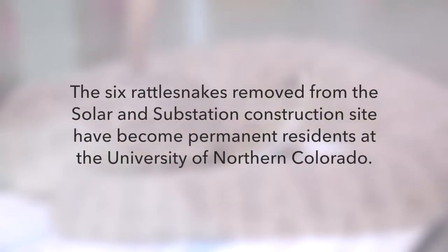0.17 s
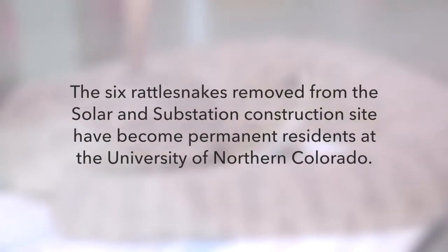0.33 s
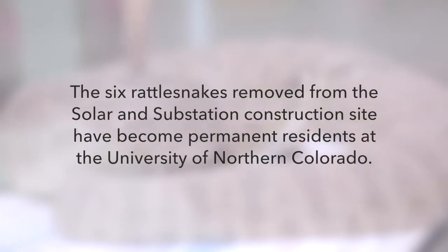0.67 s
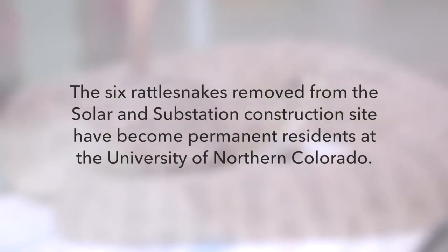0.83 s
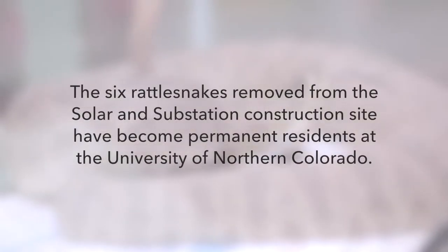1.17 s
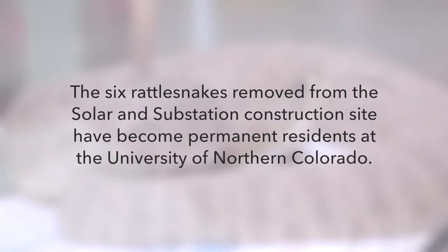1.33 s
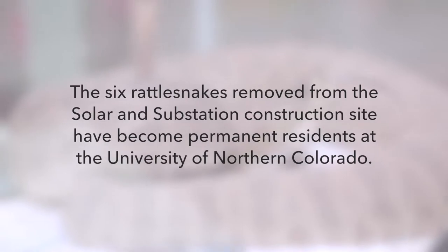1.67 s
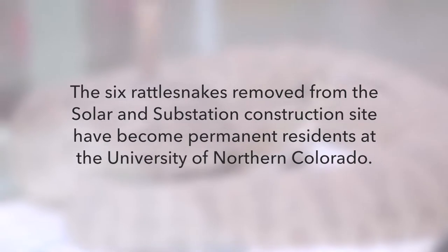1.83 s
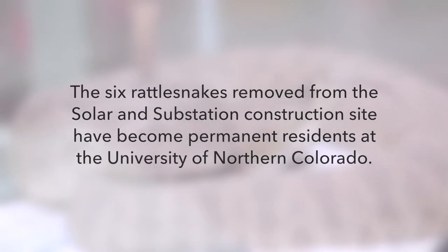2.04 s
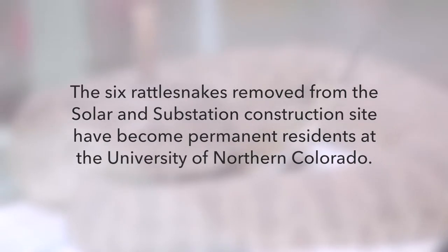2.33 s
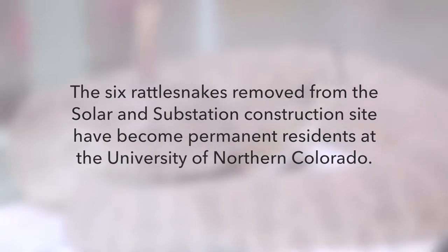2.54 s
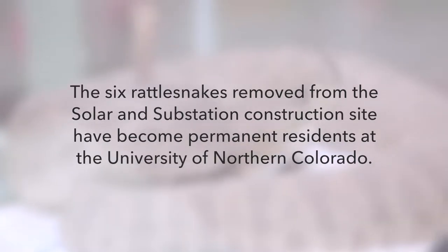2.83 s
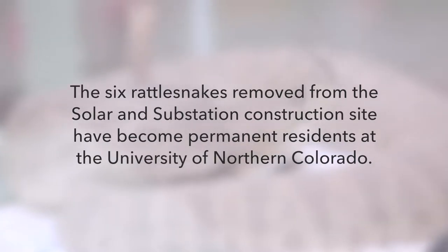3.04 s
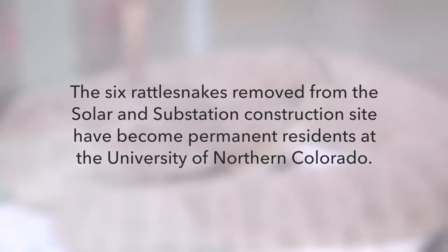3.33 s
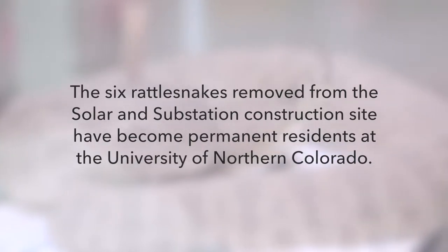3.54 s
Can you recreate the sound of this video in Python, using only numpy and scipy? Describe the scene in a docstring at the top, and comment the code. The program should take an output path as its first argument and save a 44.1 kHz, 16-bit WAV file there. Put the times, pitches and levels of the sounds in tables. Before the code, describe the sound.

A rattlesnake's tail buzzes steadily up close in a small room over a faint fan hum.

```python
"""A rattlesnake buzzes its tail close to a mono microphone in a small room: random clacks of hollow segments
crowd together several times in each shake, and cross-fading colours follow the turning tail.
Behind it a fan hums low, as wavering tones over shaped room noise.
Far off something knocks and bounces: a struck panel's short rings and noise cracks, smeared by the room."""
import sys
import numpy as np
from scipy import signal
from scipy.fft import rfft, irfft, next_fast_len
from scipy.io import wavfile
from scipy.ndimage import map_coordinates

SR = 44100
rng = np.random.default_rng(int(sys.argv[2]) if len(sys.argv) > 2 else 0)


def convert_level_to_amplitude(level_db):
    """Map a level in decibels to its linear amplitude factor."""
    exponent = np.asarray(level_db, float) / 20
    return 10 ** exponent


def log_audio(samples):
    """Write samples as a 16-bit WAV file to the path given in sys.argv[1]."""
    # one column per channel
    frames = np.atleast_2d(samples).T
    # limit to full scale, then quantise
    limited = np.clip(frames, -1, 1)
    pcm = np.round(limited * 32767).astype(np.int16)
    wavfile.write(sys.argv[1], SR, pcm)


N = 163170


def unit(x):
    """Scaled to rms 1."""
    return x / np.sqrt(np.mean(x ** 2) + 1e-20)


def curve(rows):
    """(time [s], value) rows read at every sample."""
    return np.interp(np.arange(N) / SR, *np.transpose(rows))


def wobble(rate):
    """A smooth random curve through normal draws, rate knots a second (60 at most)."""
    knots = rng.standard_normal(int(N * 60 / SR) + 4)
    return map_coordinates(knots, [np.arange(N) * rate / SR])


def coloured(x, gain):
    """x through a real gain of frequency."""
    m = next_fast_len(N + 8192)
    hz = np.fft.rfftfreq(m, 1 / SR) + 1  # 1 Hz up, so that a log axis is safe
    return irfft(rfft(x, m) * gain(hz), m)[:N]


def spectrum(points):
    """Gain through (frequency [Hz], level [dB]) points on a log frequency axis."""
    f, db = np.transpose(points)
    return lambda hz: convert_level_to_amplitude(np.interp(np.log(hz), np.log(f), db))


def echoed(x, t60, wet_db, renew_s):
    """x plus a decaying noise tail of energy wet_db, drawn anew for each overlapping stretch."""
    hop = int(renew_s * SR)
    t = np.arange(SR // 3) / SR
    wet = np.zeros(N + 4 * SR)
    window = np.sin(np.pi * np.arange(2 * hop) / (2 * hop))
    padded = np.pad(x, (hop, 2 * hop))
    for start in range(0, N + hop, hop):
        tail = rng.standard_normal(len(t)) * convert_level_to_amplitude(-60 * t / t60)
        tail = tail / np.linalg.norm(tail)
        part = signal.fftconvolve(padded[start:start + 2 * hop] * window, tail)
        wet[start:start + len(part)] += part
    return x + convert_level_to_amplitude(wet_db) * wet[hop:hop + N]


def segment_clacks():
    """Groups of hollow segments clack at random, more densely at their moments of each shake."""
    # how fast the tail shakes: (time [s], shakes a second [Hz])
    shake_rate = [(0, 51.4), (.3, 52.24), (.75, 53.83), (.95, 53.56), (1.15, 51.93), (1.5, 51.21),
                  (2, 50.3), (2.6, 50.52), (3, 49.88), (3.7, 49)]
    # how firmly the clacks lock to the shake: (time [s], steadiness [0-1])
    steadiness = [(0, 0.42), (.3, 0.74), (.65, 0.8), (1.3, 1), (3.7, 0.94)]
    # groups of segments, base to tip: (centre [Hz], base clack rate [1/s],
    # then strength of crowding once, twice, three, four times a shake [0-1], before steadiness)
    segment_groups = [(3700, 8000, .44, .26, .16, .16), (6000, 12000, .21, .25, .07, .21),
                      (8000, 12000, .21, .25, .07, .21), (10500, 16000, .4, .3, .17, .34),
                      (14000, 20000, .34, .26, .15, .3)]
    travel_rad = .3  # each group clacks this much of a shake's phase after the one before
    size_spread_db, own_flutter_db = 2, 0.37

    shake_phase = 2 * np.pi * np.cumsum(curve(shake_rate)) / SR
    steady = curve(steadiness)
    lag = rng.uniform(0, 2 * np.pi, size=4)
    centres = np.log([row[0] for row in segment_groups])
    clacks = 0
    for k, (hz, rate, *beats) in enumerate(segment_groups):
        phase = shake_phase - k * travel_rad
        crowding = sum(b * np.cos((j + 1) * phase + lag[j]) for j, b in enumerate(beats))
        busy = np.clip(1 + steady * crowding, 0, None)
        hit = rng.random(N) < rate / SR * busy
        size = convert_level_to_amplitude(size_spread_db * rng.exponential(size=N)) * rng.choice([-1, 1], N)
        flutter = convert_level_to_amplitude(own_flutter_db * wobble(14))
        # neighbouring groups share the band between their centres by energy
        band = lambda f: np.sqrt(np.interp(np.log(f), centres, np.arange(len(centres)) == k))
        clacks = clacks + coloured(unit(hit * size) * flutter, band)
    return clacks


def turning_tail(clacks):
    """The tail turns: each facing has its own colour and lift of shell resonances, and they cross-fade."""
    # when the tail faces each way most fully: time [s]
    facing_times = [.25, .65, 1.05, 1.95, 2.6, 3.3]
    # colour heard at each facing: (frequency [Hz], relative level [dB per Hz])
    facing_colours = [
        [(1290, -64), (2200, -46), (2480, -25.5), (3040, -22), (3520, -21), (4410, -15.5), (5100, -14),
         (5950, -2), (6660, -5), (8420, -7), (10500, -20.5), (11400, -19), (12100, -23), (15200, -20)],
        [(1290, -48), (2200, -22.5), (3220, -16.5), (3400, -11.5), (3690, -17), (4130, -14), (4560, -8),
         (5310, -9.5), (6140, -2), (6610, -5.5), (7280, -5), (11200, -11), (12500, -19.5), (15200, -17)],
        [(1290, -31), (2200, -25), (2650, -14.5), (2990, -18), (3270, -8.5), (3880, -5.5), (4270, -14.5),
         (6000, 0), (8630, -5), (9510, -8), (9900, -15), (10800, -13.5), (12100, -16), (15200, -13)],
        [(1290, -52), (2200, -49), (2850, -36), (3190, -16), (3840, -13.5), (4340, -11.5), (4710, -20),
         (5490, -11.5), (6090, -12.5), (6550, -7.5), (7830, -4), (8770, -14), (10100, -12.5), (12400, -29),
         (13600, -19), (15200, -22)],
        [(1290, -46), (2200, -28), (2440, -28), (2970, -20.5), (3350, -11.5), (4100, -12.5), (4410, -16),
         (5140, -12), (5810, -6.5), (6300, -5), (7400, -3.5), (9980, -11), (11600, -21), (15200, -15.5)],
        [(1290, -53), (2200, -23), (2310, -19), (2440, -39), (2520, -19.5), (2990, -24.5), (3190, -12.5),
         (3270, -9.5), (4070, -10), (4900, -13.5), (5400, -8), (5900, -5), (6050, -1), (7110, -2), (7340, 0.5),
         (8350, -5), (8560, -7), (10700, -9.5), (11700, -19.5), (13800, -14), (15200, -13)],
    ]
    # resonances of the shells: (frequency [Hz], width [Hz], full lift [dB])
    shell_rings = [(2546, 46, 6.5), (3286, 79, 3.5), (3750, 140, 2), (4220, 70, 2), (5340, 60, 5.5),
                   (5800, 79.4, 2), (6150, 130, 2), (6550, 90, 4.5), (6900, 110, 1.5), (7460, 110, 5),
                   (8120, 110, 7.5), (8700, 110, 4)]
    # share of that full lift in each facing [0-1]
    ring_shares = [.2, 0.19, .5, 0.4, .8, 0.88]

    t = np.arange(N) / SR
    heard = 0
    for k, colour in enumerate(facing_colours):
        facing = np.interp(t, facing_times, np.arange(len(facing_colours)) == k)
        lift_db = lambda f: sum(db / (1 + (2 * (f - hz) / w) ** 2) for hz, w, db in shell_rings)
        gain = lambda f: spectrum(colour)(f) * convert_level_to_amplitude(ring_shares[k] * lift_db(f))
        heard = heard + facing * unit(coloured(clacks, gain))
    return heard


def rattle():
    """The close rattle with a short, diffuse echo tail off nearby floor and walls, drawn anew every .2 s."""
    # how hard the snake rattles: (time [s], level [dB])
    effort = [(0.0, -27), (1.25, -26), (1.33, -25), (1.85, -25), (3.07, -24.5), (3.68, -24.5), (3.7, -27)]
    flutter_db = 0.13
    heard = turning_tail(segment_clacks())
    heard = echoed(heard, t60=.12, wet_db=-6, renew_s=.2)
    return unit(heard * convert_level_to_amplitude(flutter_db * wobble(22.3))) * convert_level_to_amplitude(curve(effort))


def air():
    """Broad room noise with the fan's tones, each wavering in pitch and level."""
    # colour of the room air: (frequency [Hz], relative level [dB per Hz])
    air_colour = [(15, -50), (25, -38), (60, -9), (72, -9), (97, 0), (125, -2), (185, -4), (240, 0.5),
                  (350, -2.5), (520, -0.5), (800, -4.5), (1500, -4.5), (2300, -6.5), (3400, -7),
                  (5700, -90)]
    # tones of the fan: (frequency [Hz], middle level [dB rms], width of the pitch waver [Hz])
    fan_tones = [(155.3, -51.5, 2.8), (174, -62, 2.65), (140.8, -63.5, 3), (217.8, -67, 7.73),
                 (300, -61, 7.8), (604, -65.5, 13.2)]
    air_db = -47
    t = np.arange(N) / SR
    sound = convert_level_to_amplitude(air_db) * unit(coloured(rng.standard_normal(N), spectrum(air_colour)))
    for hz, db, waver_hz in fan_tones:
        strength = convert_level_to_amplitude(db + 1.4 * wobble(12)) * np.sqrt(2)
        drift = np.cumsum(waver_hz * wobble(24.5)) / SR / 2  # in cycles
        sound = sound + strength * np.sin(2 * np.pi * (hz * t + drift))
    return sound


def knock():
    """A panel far off is struck and bounces: short rings and a crack, smeared by the room."""
    # the blows: (time [s], peak of the ring at the panel [dB])
    blow_times = [(.688, -29), (.712, -31), (.822, -34), (.908, -38)]
    # modes of the panel: (frequency [Hz], relative level [dB], decay by 60 dB [s])
    panel_modes = [(220, -5, .08), (745, 0, .14), (800, -1, .16), (870, -1, .07), (1000, -9, .05),
                   (1250, -8, .06), (1430, -6, .08), (1750, -11, .04), (2150, -8, .05)]
    # colour of the distance to the microphone: (frequency [Hz], gain [dB])
    path_colour = [(60, -60), (170, -3), (700, 0), (2400, 0), (5000, -25), (16000, -60)]
    crack_db, crack_t60_s = 10, .07  # the crack's level is relative, like the modes'

    t = np.arange(SR // 4) / SR
    blows = np.zeros(N + SR)
    for s, db in blow_times:
        ring = 0
        for hz, mode_db, t60 in panel_modes:
            # each blow excites the modes a little differently
            decay = convert_level_to_amplitude(mode_db + rng.normal(0, 1) - 60 * t / t60)
            ring = ring + decay * np.sin(2 * np.pi * hz * t)
        crack = convert_level_to_amplitude(crack_db - 60 * t / crack_t60_s) * rng.standard_normal(len(t))
        blows[round(s * SR):][:len(t)] += convert_level_to_amplitude(db) * (ring + crack) / np.abs(ring).max()
    far = coloured(blows[:N], spectrum(path_colour))
    return echoed(far, t60=.4, wet_db=-2.5, renew_s=.05)


def scene():
    """One microphone feeds both channels."""
    return np.tile(rattle() + air() + knock(), (2, 1))


def low_pass(x):
    """Removes everything above the highest recorded frequency."""
    return signal.sosfilt(signal.butter(12, 16890, fs=SR, output="sos"), x)


def record(dry):
    """The recorder keeps nothing above its band limit."""
    top_hz = 15720
    mix = np.array([coloured(x, lambda hz: hz < top_hz) for x in dry])
    return low_pass(mix)


dry = scene()
out = record(dry)
log_audio(out)
```